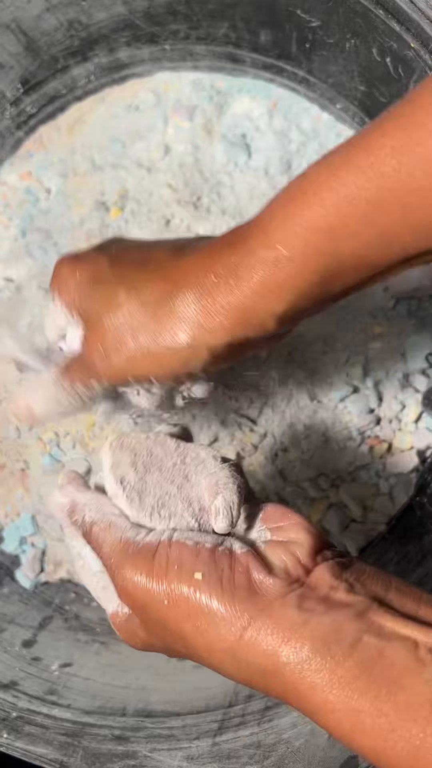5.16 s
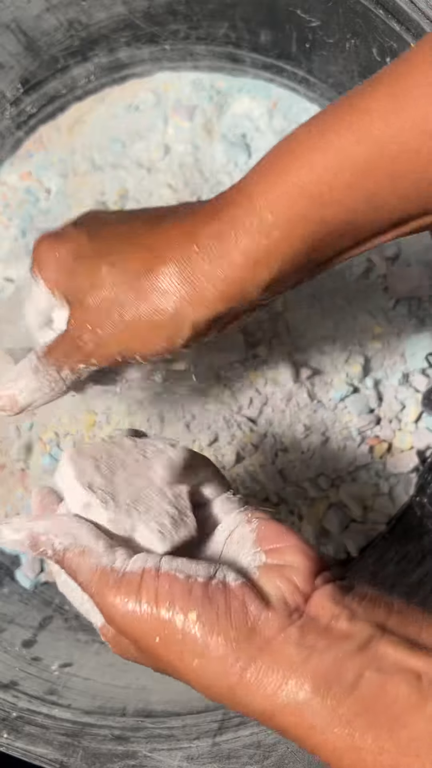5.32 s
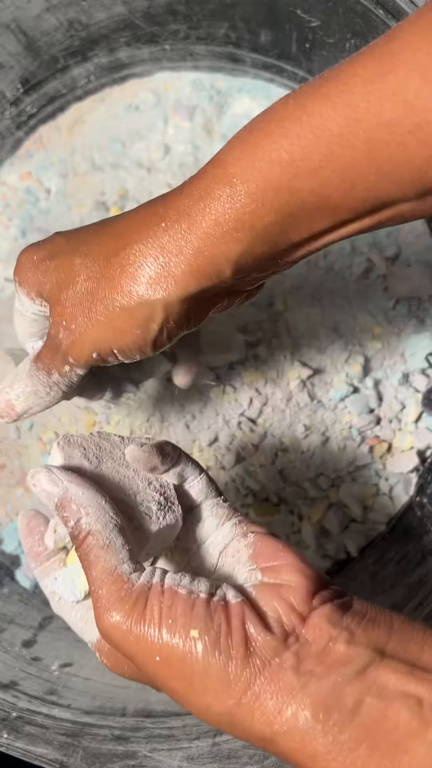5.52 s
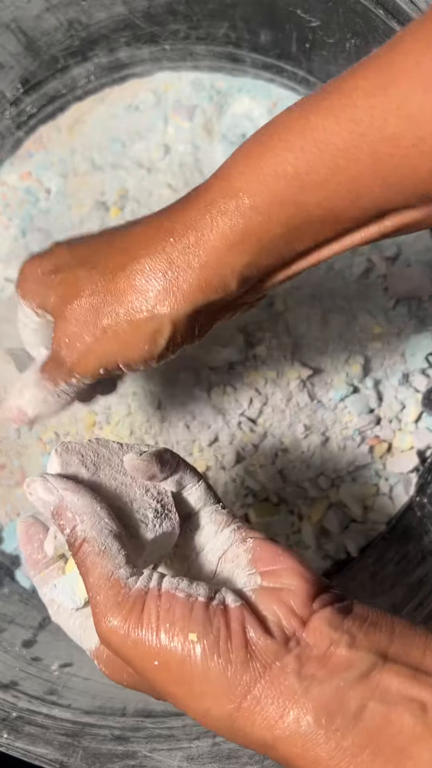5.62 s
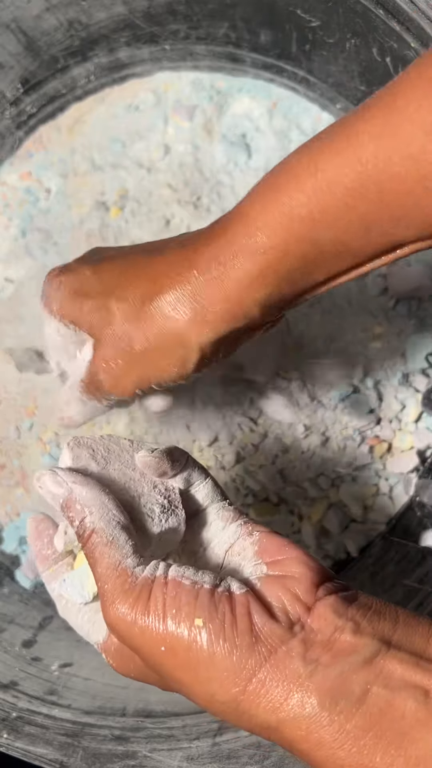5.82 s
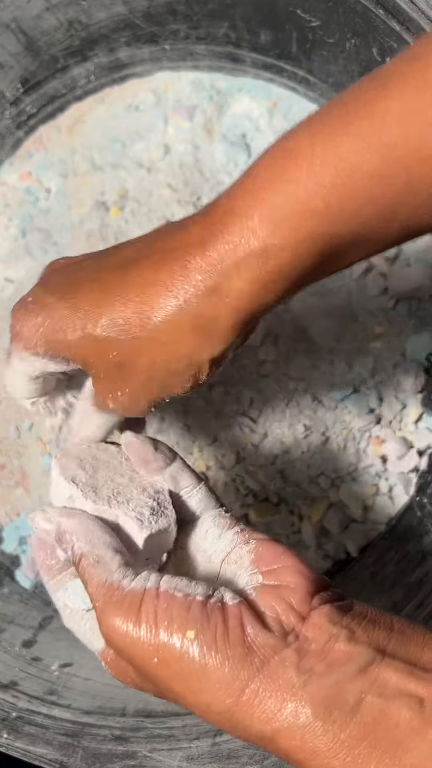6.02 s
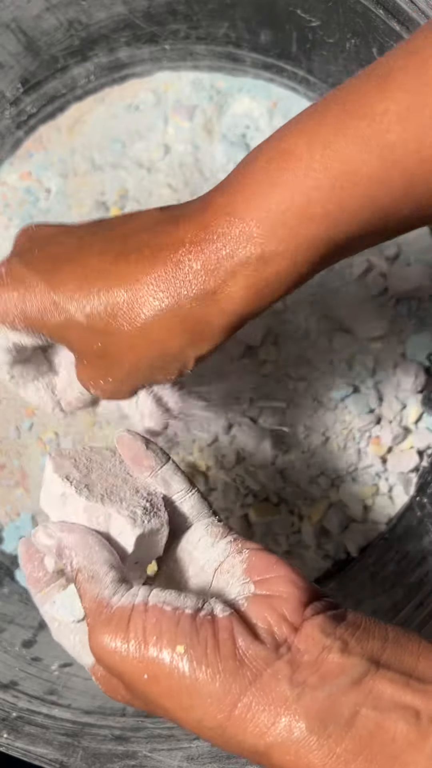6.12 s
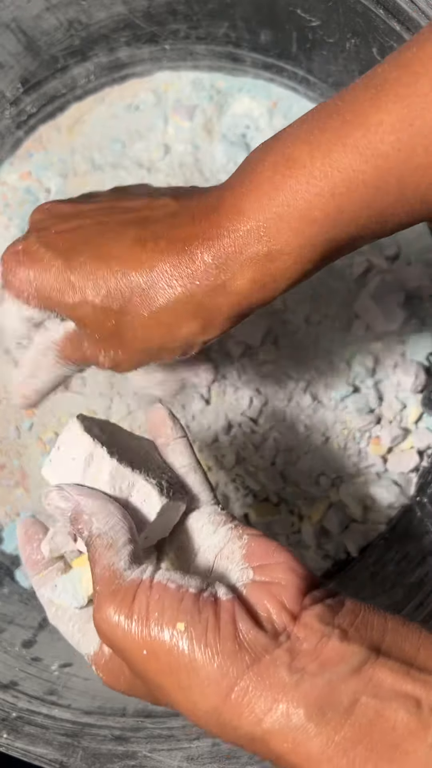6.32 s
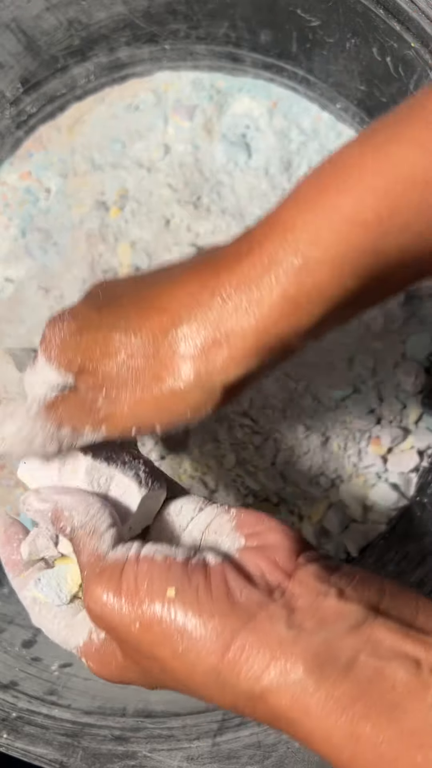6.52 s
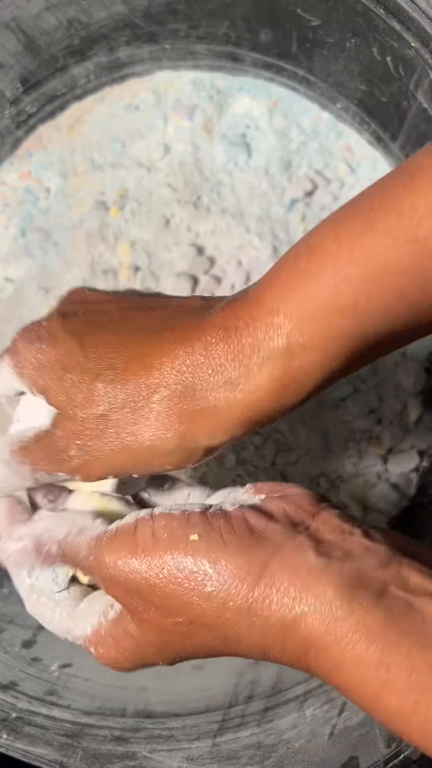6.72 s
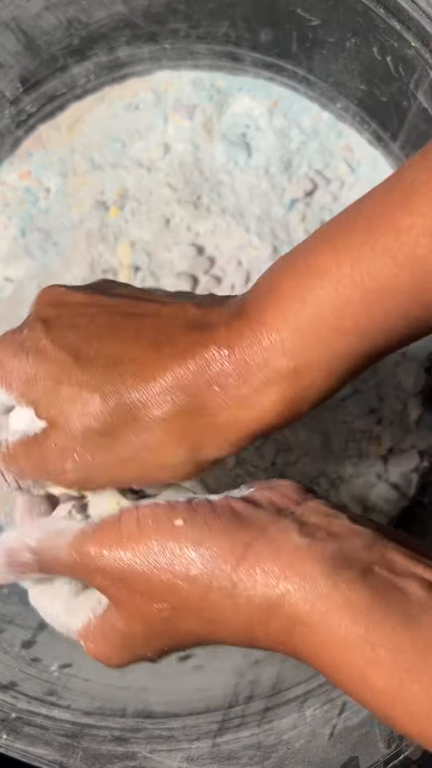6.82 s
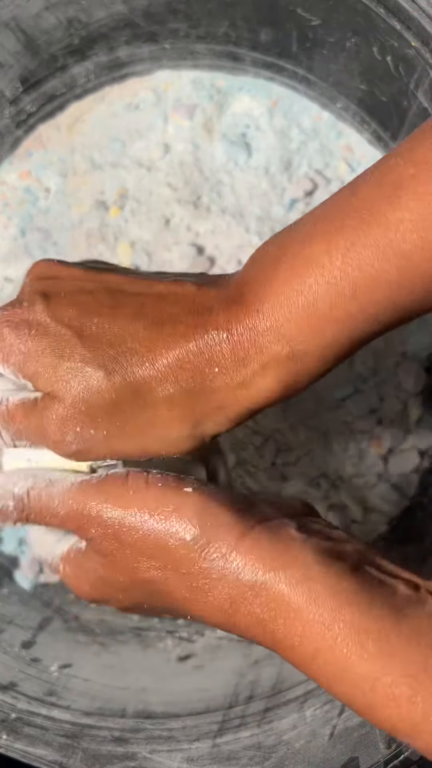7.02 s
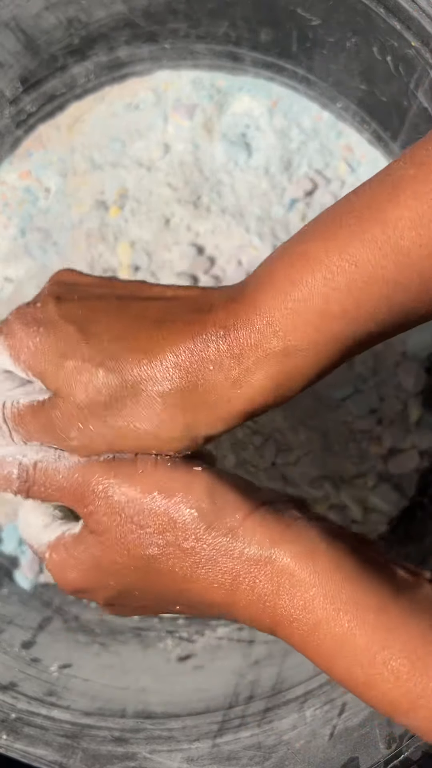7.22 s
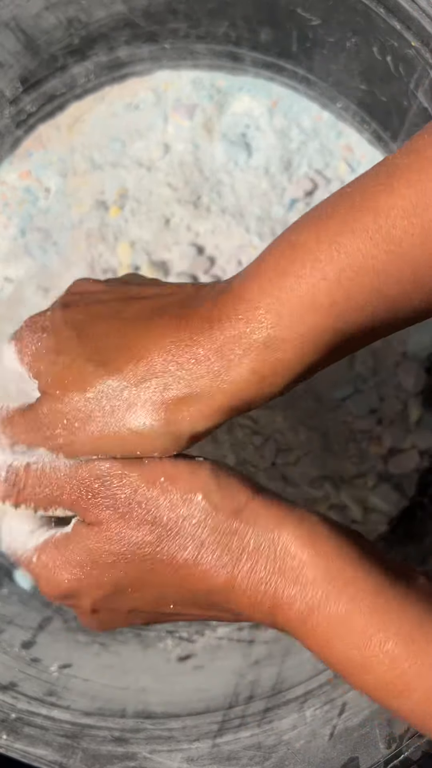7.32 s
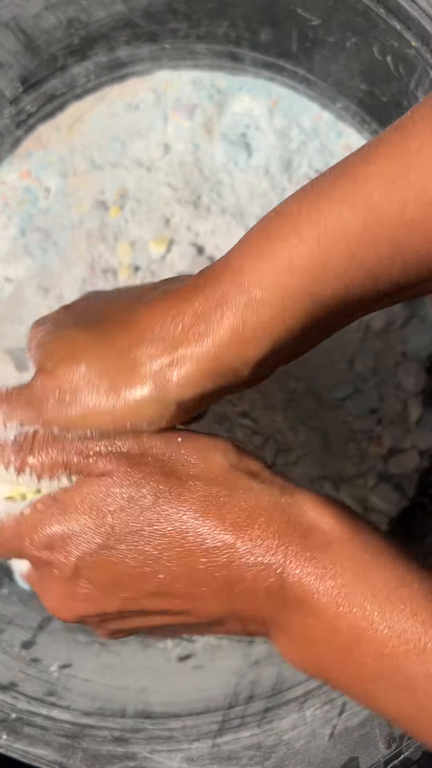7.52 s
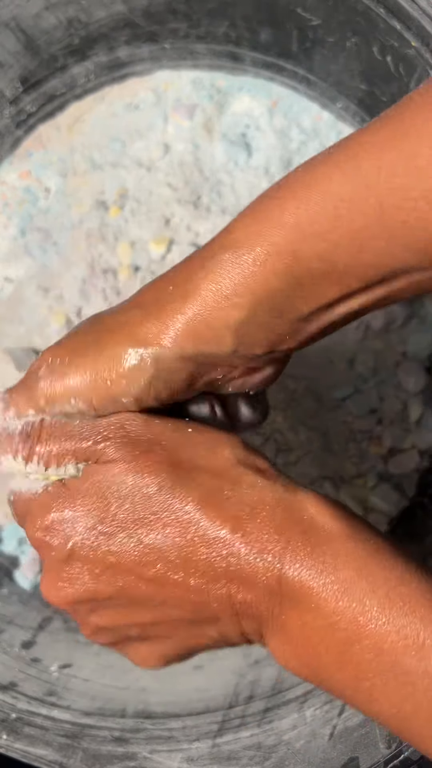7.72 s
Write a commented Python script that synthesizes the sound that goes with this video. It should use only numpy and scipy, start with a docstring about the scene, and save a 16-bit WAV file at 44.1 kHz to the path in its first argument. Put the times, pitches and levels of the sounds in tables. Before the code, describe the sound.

Hands rub and crumble chalky lumps close up, dry powder rustling softly, with sharp snaps and a few loud hollow knocks on a plastic basin.

```python
"""Crushing chalk over a plastic basin

Hands crush lumps of chalk over a basin half full of crumbs, close to a microphone.
Lumps ring the basin's modes; snapping grains are short clicks with a fizz of noise.
Powder rustling in the palms is coloured noise that swells with each rub; crumbs patter down.
Jolts shake the stand as low damped swings, over a quiet room hum of filtered noise.
The loudest knocks overload the microphone and are clipped."""
import sys
import numpy as np
from scipy import signal
from scipy.fft import irfft
from scipy.io import wavfile
from scipy.ndimage import uniform_filter1d

SR = 44100
rng = np.random.default_rng(int(sys.argv[2]) if len(sys.argv) > 2 else 0)


def ratio_of_db(decibels):
    """Turn decibels (scalar or array-like) into linear amplitude factors; 0 dB maps to 1."""
    return 10 ** (np.asarray(decibels, float) / 20)


def transcribe(u):
    """Save the signal u as a 16-bit wav file named by the first command-line argument.

    u: samples, shape (n,) or (channels, n), limited to [-1, 1]; the rate is SR.
    q: integer samples, one column per channel.
    """
    v = np.clip(np.atleast_2d(u).T, -1, 1)
    q = np.round(v * 32767).astype(np.int16)
    wavfile.write(sys.argv[1], SR, q)


N = 342657  # length in samples

# ringing modes of the basin: (frequency [Hz], relative level [dB], factor on the ring time [1])
BASIN_MODES = [(172, 3, 0.6), (244.4, -1, 1.05), (324.5, 5, 0.8), (386.4, 2.5, 0.8), (421, -7, 0.61),
               (504, 1, 0.31), (591.4, -3.5, 0.93), (644, -0.5, 0.4), (757.7, -7, 0.65), (846.5, -2, 0.53),
               (975, -4.5, 0.55), (1147, -0.5, 0.41), (1413.6, -4, 0.64), (1457, -5, 0.33),
               (1688, 0.5, 0.39), (2062, 7.5, 0.47), (2247, 5, 0.35), (2602, -3, .6), (2920, -2.5, 0.71),
               (3310, -5, .6), (3750, -11.5, .6)]


def evened(x):
    """Scales to rms 1."""
    return x / np.sqrt(np.mean(x ** 2) + 1e-20)


def read(points, hz):
    """Reads a spectrum on a log-frequency axis."""
    f, value = np.transpose(points)
    return np.interp(np.log(hz + 1), np.log(f + 1), value)


def add(mix, s, sound):
    """Mixes a sound in at s seconds."""
    part = mix[round(s * SR):][:len(sound)]
    part += sound[:len(part)]


def hump(hz, centre_hz, octaves):
    """Gain of a bell-shaped band on a log-frequency axis."""
    distance = np.log2((hz + 1) / centre_hz) / max(octaves, .15)
    return np.exp(-distance ** 2 / 2)


def shaped(x, db_of, size):
    """Colours x frame by frame with db_of(Hz column, time row)."""
    overlap = size * 3 // 4
    hz, t, z = signal.stft(x, SR, nperseg=size, noverlap=overlap)
    coloured = z * ratio_of_db(db_of(hz[:, None], t[None]))
    return signal.istft(coloured, SR, nperseg=size, noverlap=overlap)[1][:N]


def room():
    """Steady room tone of filtered noise, with a low wobble that swells when the stand moves."""
    # colour of the room tone: (frequency [Hz], relative level per Hz [dB])
    room_colour = [(12, -25), (20, -5), (48, -12.5), (56, -6), (64, -4), (80, -13), (140, -15.5),
                   (200, -16), (245, -14.5), (340, -15), (420, -22.5), (485, -20.5), (580, -18.5),
                   (720, -26.5), (1190, -29.5), (2500, -38), (7300, -56.5), (9700, -48.5), (16000, -64)]
    # rms level of the low wobble of the stand: (time [s], level [dB])
    wobble_levels = [(0, -54), (.5, -50), (1.4, -49.5), (1.9, -55), (2.03, -30), (2.16, -49), (3.6, -53),
                     (4.26, -47), (4.4, -54), (4.75, -49), (4.87, -39), (5.02, -48), (5.28, -52),
                     (5.39, -39.5), (5.55, -56), (5.73, -38), (5.81, -48), (5.94, -30), (6.3, -46),
                     (6.62, -54), (7.77, -51.5)]
    tone = evened(shaped(rng.standard_normal(N), lambda hz, t: read(room_colour, hz) + 0 * t, size=4096))
    band = signal.butter(2, [30, 62], "band", fs=SR, output="sos")
    wobble = evened(signal.sosfilt(band, rng.standard_normal(N)))
    s, level_db = np.transpose(wobble_levels)
    return ratio_of_db(-51) * tone + wobble * ratio_of_db(np.interp(np.arange(N) / SR, s, level_db))


def walls(x):
    """Sparse reflections from the basin rim and the room, dying fast."""
    at = np.arange(60, 12000, 22)
    fade = ratio_of_db(-60 * at / SR / 0.18)  # 60 dB in 0.18 s
    taps = np.zeros(12100)
    taps[at + rng.integers(0, 22, len(at))] = rng.choice([-1., 1.], len(at)) * fade
    return signal.fftconvolve(x, taps / np.linalg.norm(taps))[:N]


def jolt(db, hz, t60):
    """A damped low swing of the stand."""
    t = np.arange(SR // 2) / SR
    return ratio_of_db(db - 60 * t / t60) * np.sin(2 * np.pi * hz * t) * (1 - np.exp(-t / 0.002))


def jolts():
    """Every jolt: the stand is pushed and swings at its own low pitch until it settles."""
    # (time [s], level before rise and decay [dB], frequency [Hz], time to fade 60 dB [s])
    jolt_list = [(2.003, -25, 130, .08), (4.858, -25, 165, .09), (5.926, -11, 138, 0.056),
                 (5.946, -14.5, 36, 0.3), (6.178, -13, 180, 0.036)]
    stand = np.zeros(N)
    for s, *row in jolt_list:
        add(stand, s, jolt(*row))
    return stand


def rubs(t):
    """Relative power of every rub, and last of the trickle, at times t; with low-mid and hiss weights."""
    # rubs of powder in the palms: (time of peak [s], relative peak level [dB], time to fade 10 dB [s],
    # weight of the low mids [dB], hiss near 6 kHz [dB])
    rub_list = [(.018, -60, .022, 8, -4), (.065, -60, .03, 15, -8), (.285, -58, .065, 3, 3),
                (.378, -51, .04, 2, 10), (.535, -50.5, .042, 5, 0), (.69, -67, .04, 4, 0),
                (.778, -55.5, .055, 3, 9), (.84, -61, .04, -5, -3), (.925, -57, .07, 0, -3),
                (1.013, -57, .035, 6, -3), (1.15, -54, .045, 0, -3), (1.2, -54, .035, -6, -3),
                (1.28, -57.5, .08, 2, -6), (1.36, -58, .06, 4, -8), (1.425, -59, .04, 8, -8),
                (1.477, -56, .025, 4, -5), (1.545, -52, .04, -2, 2), (1.61, -58, .06, -6, 0),
                (1.71, -58, .04, -9, 0), (1.84, -57, .08, -13, 0), (1.92, -52.5, .07, -10, -1),
                (2.01, -49, .07, -6, -2), (2.1, -52, .045, -15, -4), (2.19, -61, .05, 4, -2),
                (2.255, -48, .045, -12, 0), (2.35, -58, .07, 0, -2), (2.489, -54, .055, 10, -11),
                (2.58, -60, .05, 5, -7), (2.67, -55, .085, 0, -8), (2.78, -62, .08, 5, -2),
                (2.885, -59, .035, 2, 2), (2.96, -57, .035, -15, 4), (3.04, -58, .04, -1, 6),
                (3.12, -57, .09, -2, 2), (3.25, -59, .09, 5, -8), (3.44, -59, .06, 14, -18),
                (3.55, -58.5, .045, 12, 3), (3.69, -56.5, .06, -23, 0), (3.805, -56, .065, -8, 1),
                (3.951, -55, .045, -3, 0), (4.075, -61, .03, 5, -5), (4.135, -48.5, .045, 5, -26),
                (4.26, -55, .085, 2, -9), (4.41, -63, .05, -1, -4), (4.5, -65, .06, -1, -4),
                (4.625, -58, .05, -12, -3), (4.73, -61, .09, -8, 0), (4.872, -50, .022, -6, -5),
                (4.924, -42, .02, 0, -12), (4.96, -60, .05, -2, -3), (5.09, -58, .04, 3, 3),
                (5.145, -49, .04, 4, 5), (5.21, -61, .04, 8, -5), (5.29, -62, .03, 8, -5),
                (5.375, -49.5, .022, 8, -17), (5.435, -57, .04, 12, 0), (5.51, -61, .06, 10, 0),
                (5.635, -58, .05, 1, -5), (5.727, -53, .03, 15, -2), (5.81, -53, .06, 3, -1),
                (5.92, -48.5, .075, 13, 2), (6.03, -56, .09, 12, -2), (6.165, -53, .07, 3, -9),
                (6.245, -57, .03, 0, -4), (6.324, -43, .017, 5, -19), (6.41, -59, .045, -4, 0),
                (6.53, -59, .05, 3, 2), (6.625, -57, .035, -8, 2), (6.73, -59, .08, -6, -4),
                (6.84, -66, .03, 0, -4), (6.975, -58.5, .07, -9, -5), (7.084, -61, .03, 8, -10),
                (7.18, -57, .06, 2, -3), (7.285, -64, .022, -4, -4), (7.43, -64, .06, 2, -5),
                (7.555, -55, .045, -3, -8), (7.67, -56.5, .04, -8, -4), (7.74, -68, .04, 4, -4)]
    rise_share = .85  # rise time over fade time
    roundness = 1.8  # 1 = pointed swell, 2 = round top with steep flanks
    rest_db, rest_low_db, rest_hiss_db = -72, 7, -1.5  # trickle of powder between rubs, relative
    s, db, fade_s, low_db, hiss_db = np.transpose(rub_list)[:, :, None]
    away = np.maximum(t - s, (s - t) / rise_share) / np.maximum(fade_s, .005)
    swells = ratio_of_db(2 * (db - 10 * away ** roundness))  # doubled dB turns amplitude into power
    power = np.vstack([swells, ratio_of_db(2 * rest_db) + 0 * t])
    return power, np.append(low_db, rest_low_db), np.append(hiss_db, rest_hiss_db)


def rustle():
    """Powder in the palms: dense tiny grains and smooth friction noise; the colour drifts in patches."""
    # colour of the powder: (frequency [Hz], relative level per Hz [dB])
    powder_colour = [(250, -40.5), (600, -6), (1100, -16.5), (1700, 0), (2500, -6), (3500, -5.5),
                     (5500, -7), (6400, -10.5), (7300, -15), (8800, -9.5), (10400, -8), (12500, -14.5),
                     (15300, -19), (16200, -43)]
    sizes = ratio_of_db(7.1 * np.minimum(rng.exponential(1, N), 5))
    sizes = sizes * (rng.random(N) < 1500 / SR)  # about 1500 grains a second
    fizz = signal.lfilter([1], [1, -.985], sizes)  # each grain dies away within a few ms
    grains = evened(fizz * rng.standard_normal(N))
    drive = 0.75 * grains + 0.76 * rng.standard_normal(N)
    patches = rng.standard_normal((N // 64 + 2, 129)).T
    patches = uniform_filter1d(patches, 6, axis=0)  # smooth over frequency
    patches = evened(uniform_filter1d(patches, 30, axis=1))  # smooth over time

    def colour(hz, t):
        """Adds up spectrum, stroke level, tilts and patches in dB."""
        high = np.clip(np.log2((hz + 1) / 6500) * 3, 0, 1)
        low = np.clip(np.log2(2500 / (hz + 1)), 0, 1)
        power, low_db, hiss_db = rubs(t)
        treble_db = .5 + .3 * hiss_db  # the top brightens with the hiss
        tilt = high * treble_db + low * low_db + hump(hz, 6170, 0.24) * hiss_db
        stroke_db = 10 * np.log10(ratio_of_db(2 * tilt) @ power)
        return read(powder_colour, hz) + stroke_db + 2.0 * patches[:, :t.size]
    return ratio_of_db(11) * shaped(drive, colour, size=256)


def debris():
    """Crumbs shed by each stroke patter on the basin: more of them, and louder, as the stroke swells."""
    s = np.arange(0, N / SR, .002)
    power, low_db, _ = rubs(s)
    stroke_db = np.interp(np.arange(N) / SR, s, 10 * np.log10(ratio_of_db(0.94 * low_db) @ power))
    falls = rng.random(N) < 220 * ratio_of_db(.5 * (stroke_db + 50)) / SR
    sizes = falls * ratio_of_db(1.119 * stroke_db + 3.5 * np.minimum(rng.exponential(1, N), 4))
    kind = rng.integers(0, 24, N)
    t = np.arange(900) / SR
    out = np.zeros(N)
    for k, chance in enumerate(rng.standard_normal((24, 3))):
        hz = 1800 * 2 ** (.7 * chance[:, None])  # three pitches for each kind of crumb
        pings = np.sin(2 * np.pi * hz * t) * ratio_of_db(-60 * t * hz / 15)  # 60 dB in 15 cycles
        out += signal.oaconvolve(sizes * (kind == k), pings.sum(0))[:N]
    return ratio_of_db(8) * out


def snap(db, treble_db, t60, noise):
    """One sharp break and a fizz of splinters, heard in a body band and a treble band."""
    t = np.arange(len(noise)) / SR
    burst = .22 * noise * ratio_of_db(-60 * t / np.clip(t60, .002, .06))
    burst[0] += 1
    hz = np.fft.rfftfreq(256, 1 / SR)
    body_band = hump(hz, 3600, 0.53)
    treble_band = hump(hz, 9100, 0.22) + .12 * hump(hz, 13000, .25)
    body, treble = (np.fft.fftshift(irfft(band))[96:] for band in (body_band, treble_band))
    low, high = signal.fftconvolve(burst, body), signal.fftconvolve(burst, treble)
    return ratio_of_db(db) * (low / abs(low).max() + ratio_of_db(treble_db) * high / abs(high).max())


def ticks():
    """Small grains snap at random, each louder while a rub is strong."""
    s = np.arange(0, N / SR, .002)
    stroke = np.interp(np.arange(N) / SR, s, np.sqrt(rubs(s)[0].sum(0)))
    breaks = rng.random(N) < 25 / SR  # about 25 a second
    sizes = breaks * stroke * ratio_of_db(4.5 * np.minimum(rng.exponential(1, N), 3))
    kind = rng.integers(0, 8, N)
    out = np.zeros(N)
    for k, chance in enumerate(rng.standard_normal((8, 1500))):
        shape = snap(0, -10 + 6.5 * chance[0], .015 * 2 ** chance[1], chance[2:])
        out += signal.oaconvolve(sizes * (kind == k), shape)[:N]
    return ratio_of_db(6) * out


def snaps():
    """The larger grains: each breaks once at its own moment and splinters with fresh noise."""
    # (time [s], peak level of the body [dB], treble over body [dB], time for the fizz to fade 60 dB [s])
    snap_list = [(0.0605, -34, -21, 0.014), (0.5049, -34, -1, 0.054), (0.9972, -39.5, -0.5, 0.05),
                 (1.083, -40.5, -2, 0.058), (1.1367, -39.5, -5, 0.041), (1.202, -30.5, -10, 0.028),
                 (1.339, -37, -8, 0.019), (1.3715, -33, -3.5, 0.046), (2.0032, -27, -10, 0.035),
                 (2.161, -37, -13, 0.0051), (2.2001, -28, -19, 0.0047), (2.2556, -27, -15, 0.02),
                 (2.2775, -33, -21, 0.016), (2.476, -34, -6, 0.01), (2.623, -30.5, -14, 0.014),
                 (2.6474, -34.5, -18, 0.022), (3.0345, -36.5, -9, 0.02), (3.3146, -42, -6, 0.0086),
                 (3.4314, -32.5, -16, 0.015), (3.4744, -44, -3, 0.031), (3.5504, -29.5, -18, 0.0059),
                 (4.0646, -38.5, -7, 0.029), (4.1423, -26, -14, 0.026), (4.4786, -36.5, -21, 0.0072),
                 (4.768, -41, -7, 0.054), (4.8537, -20.5, -10.5, 0.016), (4.9107, -22, -13, 0.038),
                 (4.9164, -29, -6, 0.027), (5.1127, -36.5, 1, 0.015), (5.1345, -31, -14, 0.023),
                 (5.1513, -37.5, 10.5, 0.024), (5.168, -19.5, -3, 0.0057), (5.201, -32.5, -19, 0.013),
                 (5.2086, -33, -6.5, 0.0055), (5.286, -32, -13, 0.01), (5.3348, -34.5, -8, 0.012),
                 (5.3562, -32, -18, 0.0062), (5.4261, -21, -19.5, 0.0053), (5.6187, -32.5, -4, 0.0055),
                 (5.6444, -33, -15, 0.007), (5.7233, -21, -6.5, 0.031), (5.7768, -11, 1, 0.037),
                 (5.7998, -17, -10, 0.007), (5.8488, -9, -15.5, 0.0059), (5.8678, -36, 12, 0.0058),
                 (5.878, -36, 11.5, 0.0048), (5.8877, -40, 6, 0.03), (5.8985, -35, -4, 0.037),
                 (5.9042, -21, -11, 0.0099), (5.9116, -28, -13, 0.014), (5.9385, -32, -3, 0.013),
                 (5.9564, -33, -2, 0.011), (6.042, -33.5, -10, 0.014), (6.1562, -38, 0, 0.029),
                 (6.234, -27, -19, 0.007), (6.241, -33, -6, 0.013), (6.29, -31, -18, 0.004),
                 (6.3093, -37, -4, 0.059), (6.3122, -23.5, -15, 0.038), (6.3677, -36, -16, 0.012),
                 (6.5095, -21, -6, 0.012), (6.5593, -30, 2, 0.0052), (6.5672, -29.5, -5.5, 0.0094),
                 (6.7096, -24.5, -28.5, 0.017), (6.7488, -39, -12, 0.007), (7.0803, -38, -11, 0.015),
                 (7.0918, -41, -3, 0.014), (7.1458, -38, -2, 0.011), (7.4985, -29, -15, 0.011)]
    out = np.zeros(N)
    for (s, *row), noise in zip(snap_list, rng.standard_normal((len(snap_list), 2500))):
        add(out, s, snap(*row, noise))
    return out


def knock(db, centre, floor_db, t60, chance):
    """A blow and a few later contacts ring the modes near its centre; shifting crumbs detune them."""
    level_chance, delay_chance, strength_chance, pitch_chance = chance
    t = np.arange(6000) / SR
    ring_s = np.clip(t60, .01, .12)
    hz, mode_db, slow = np.transpose(BASIN_MODES)[:, :, None]
    floor = hz < 430  # the low modes belong to the basin floor, the others to its wall
    # a blow that booms more also excites a wider band of wall modes
    wall = ~floor * hump(hz, 500 * 2 ** centre, .66 + .012 * floor_db)
    weight = wall / np.linalg.norm(wall) + floor * ratio_of_db(np.minimum(floor_db, 4) - 12.5)
    weight = weight * ratio_of_db(mode_db + 1.6 * level_chance[:, None])
    detuned_hz = hz * (1 + 0.016 * pitch_chance[:, None])
    rings = -weight * ratio_of_db(-60 * t / (slow * ring_s)) * np.sin(2 * np.pi * detuned_hz * t)
    cut = signal.butter(3, 310 * 2 ** np.clip(centre, 0, 2.5), "high", fs=SR, output="sos")
    is_wall = ~floor[:, 0]
    rings[is_wall] = signal.sosfilt(cut, rings[is_wall])  # a small patch of wall moves no bass
    # big lumps land softer and the floor takes time to swing
    rise = np.where(floor, .0025, 0.0011 / 2 ** centre)
    ringing = (rings * (1 - np.exp(-t / rise))).sum(0)
    contacts = np.zeros(1500)
    late = .0015 + abs(delay_chance[:6]) * .075 * ring_s  # seconds after the blow
    np.add.at(contacts, np.minimum(late * SR, 1499).astype(int), .13 * strength_chance[:6])
    contacts[0] += 1
    sound = signal.fftconvolve(ringing, contacts)
    return ratio_of_db(db) * sound / abs(sound).max()


def knocks():
    """All the lumps that hit the basin, each ringing its modes a little differently."""
    # (time [s], peak level [dB], centre [octaves above 500 Hz], relative boom of the basin floor [dB],
    # time to fade 60 dB before each mode's factor [s])
    knock_list = [(0.0616, -16.5, 2.6, 2, 0.02), (0.5041, -38, 1.8, -16, 0.044),
                  (0.802, -40, 0.99, 0, 0.02), (0.9977, -25.5, 1.24, -13, 0.03),
                  (1.0825, -35, 0.75, -6, 0.045), (1.141, -35, 2.1, -5, 0.048),
                  (1.2017, -33, 1.4, -22, 0.035), (1.218, -31, 1.94, -11, 0.022),
                  (1.3413, -32, 1.53, -18, 0.1), (1.3714, -20, 1.13, -3, 0.03),
                  (1.3982, -36, 1.4, -11, 0.036), (1.4265, -33.5, 1.8, -8, 0.033),
                  (1.468, -30, 2, -20, 0.033), (1.48, -26, 1.85, -6, 0.013),
                  (1.553, -24.5, 0.98, -18, 0.029), (1.9, -25, 0.6, -6, 0.054),
                  (1.924, -24, 0.33, 1.5, 0.05), (1.9404, -26, 0.5, 2, 0.03), (1.9995, 6.5, 0.42, -8, 0.06),
                  (2.043, -23, 1.1, -12, 0.04), (2.2003, -34, 1.7, -8, 0.027),
                  (2.4568, -34, 1.9, -16, 0.052), (2.474, -13.5, 2.1, -13, 0.021),
                  (2.501, -20.5, 1.72, -4, 0.024), (2.6389, -31, 2, 3, 0.072),
                  (2.8765, -35, 1.47, -16, 0.043), (3.024, -31, 2.1, 2, 0.052),
                  (3.1251, -33, 0.38, -6, 0.04), (3.1762, -31, 1.22, -6, 0.02),
                  (3.2253, -35, 0.79, -21, 0.059), (3.4318, -15.5, 1.8, -25, 0.017),
                  (3.479, -27, 1.86, -29, 0.034), (3.5277, -28, 1.55, -19, 0.024),
                  (3.551, -31.5, 1.3, -10, 0.029), (4.063, -27.5, 1.62, -19, 0.036),
                  (4.1026, -23, 1.7, -30, 0.015), (4.116, -18, 1.79, -10.5, 0.015),
                  (4.1404, -24, 1.45, -1, 0.017), (4.48, -23, 1.95, 0, 0.025), (4.771, -14, 0.2, 0, 0.028),
                  (4.8285, -36, 0.44, 1.5, 0.1), (4.8541, 7, 0.45, -6, 0.054), (4.9081, -29, 1.3, -17, 0.1),
                  (4.917, -27, 1.6, -17, 0.036), (5.004, -12.5, 0.6, -3, 0.055),
                  (5.0143, -22, 0.2, 0, 0.023), (5.1688, -19.5, 1.7, -22, 0.012),
                  (5.201, -24.5, 0.67, -22, 0.032), (5.2713, -25.5, 1.2, -8, 0.052),
                  (5.2872, -27, 1.8, 3, 0.018), (5.3323, -30, 1.27, 0, 0.049),
                  (5.3556, -3, 0.72, -14, 0.08), (5.4185, -25, 0.71, 3, 0.026),
                  (5.4252, -13, 1.37, -9, 0.039), (5.5212, -15, 1.05, -29, 0.061),
                  (5.6138, -24.5, 1.12, 3, 0.053), (5.706, -25.5, 0.24, 3, 0.047),
                  (5.724, -12, 1.72, -15, 0.021), (5.7786, 0, 0.9, -17.5, 0.05),
                  (5.806, -24, 0.9, -12, 0.035), (5.833, -24, 0.73, -11, 0.034),
                  (5.8494, -3, 1.19, -30, 0.014), (5.8603, -14, 1.17, -6, 0.065),
                  (5.897, -29, 0.99, -3, 0.1), (5.91, -19, 0.67, 3, 0.038), (5.923, -24.5, 0.67, 0, 0.11),
                  (5.9345, -13, 0.76, -7, 0.037), (5.943, -22, 1.9, -14, 0.045),
                  (5.956, -23, 1.4, -12, 0.04), (5.9706, -21, 1.0, -5, 0.064), (5.9933, -26, 1.0, -4, 0.04),
                  (6.008, -29, 1.1, -6, 0.04), (6.0437, -23, 1.44, -17, 0.024),
                  (6.052, -21.5, 1.42, -19, 0.011), (6.062, -32, 0.9, -8, 0.02),
                  (6.1077, -28.5, 2, -10, 0.013), (6.1569, -26.5, 0.72, -10, 0.037),
                  (6.1813, -14.5, 0.92, -5, 0.036), (6.2335, -27, 3.5, -19, 0.018),
                  (6.2654, -33, 0.6, -4, 0.07), (6.3093, -30, 3.7, -11, 0.062),
                  (6.3292, -13, 0.86, 0, 0.042), (6.356, -25, 0.31, -14, 0.028),
                  (6.5097, -20.5, 1.37, -37, 0.024), (6.5475, -34, 1.75, -19, 0.021),
                  (6.5667, -27, 1.78, -23, 0.033), (6.7107, -11, 1.0, -30, 0.036),
                  (7.04, -36, 2, -20, 0.025), (7.0889, -29, 1.4, -14, 0.041),
                  (7.172, -27.5, 1.13, 2.5, 0.036), (7.207, -35, 1.6, -2, 0.03),
                  (7.3148, -40, 0.14, 3, 0.031), (7.5067, -30.5, 1.14, -4.5, 0.081)]
    out = np.zeros(N)
    chances = rng.standard_normal((len(knock_list), 4, len(BASIN_MODES)))
    for (s, *row), chance in zip(knock_list, chances):
        add(out, s, knock(*row, chance))
    return out


def scene():
    """Hits with their reflections over the shaken stand, the rustle and the room."""
    hits = knocks() + snaps() + debris() + ticks()
    return (hits + ratio_of_db(-20) * walls(hits) + jolts() + rustle() + room())[None]


def band_limit(x):
    """A steep low-pass at the top of the band."""
    return signal.sosfilt(signal.butter(12, 16810, fs=SR, output="sos"), x)


def record(dry):
    """The microphone input clips just under full scale, with a short knee."""
    ceiling = .95
    clipped = dry / (1 + abs(dry / ceiling) ** 6) ** (1 / 6)
    return band_limit(clipped)


dry = scene()
out = record(dry)
transcribe(out)
```